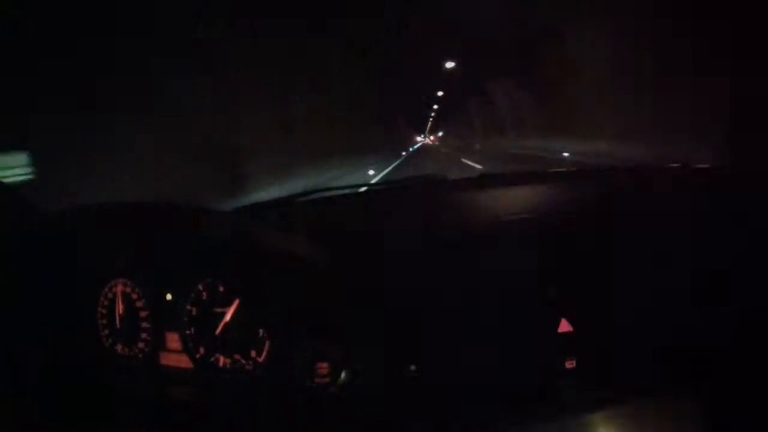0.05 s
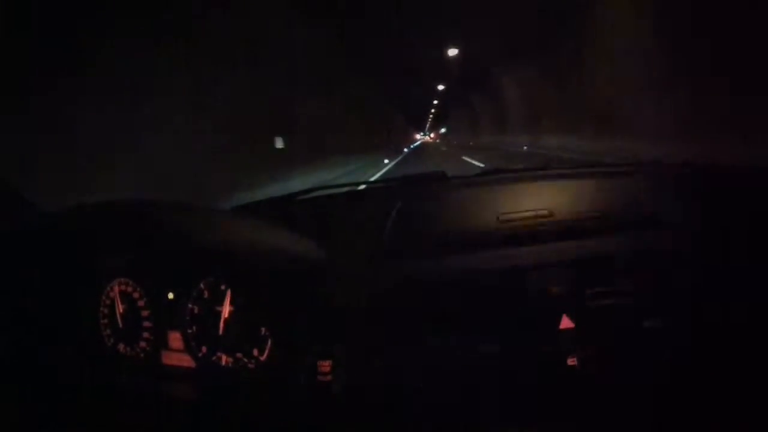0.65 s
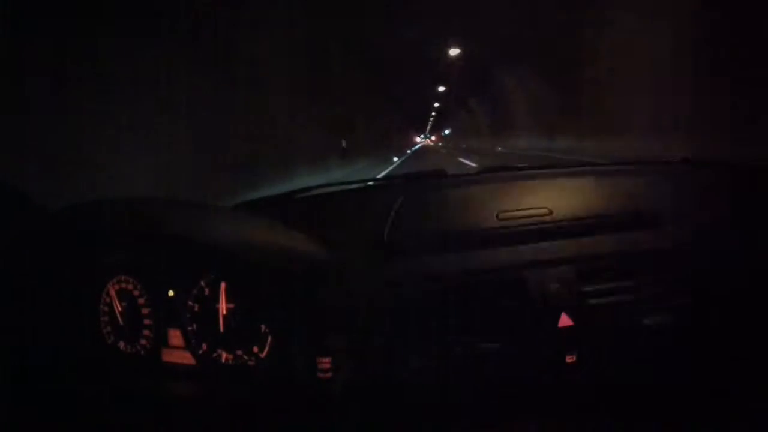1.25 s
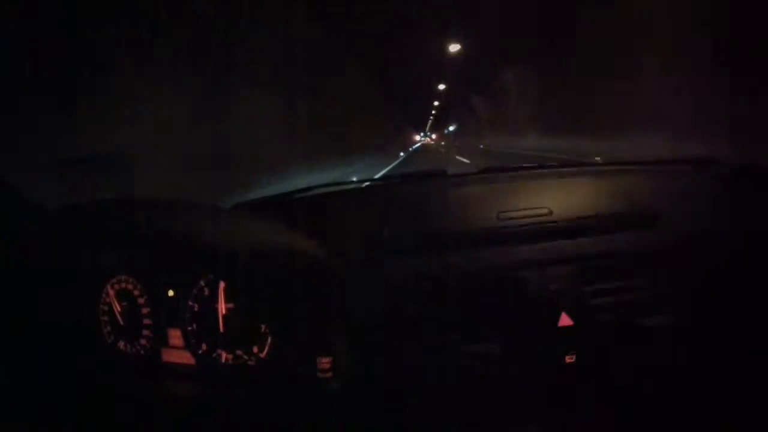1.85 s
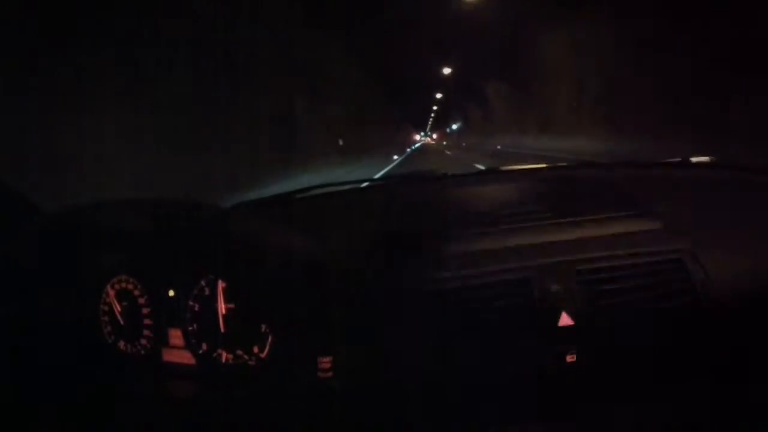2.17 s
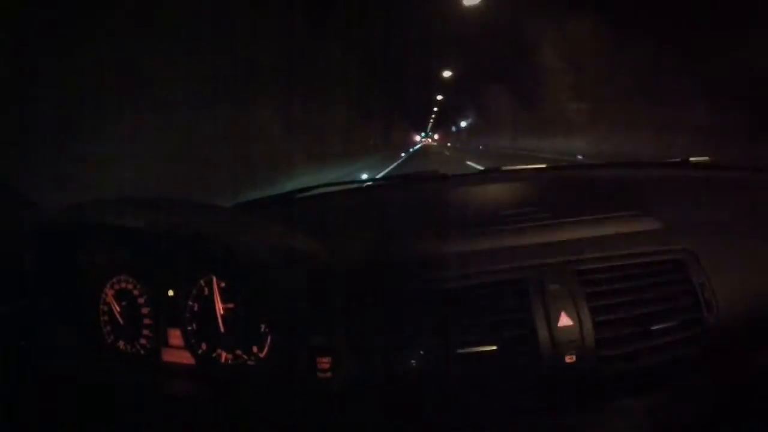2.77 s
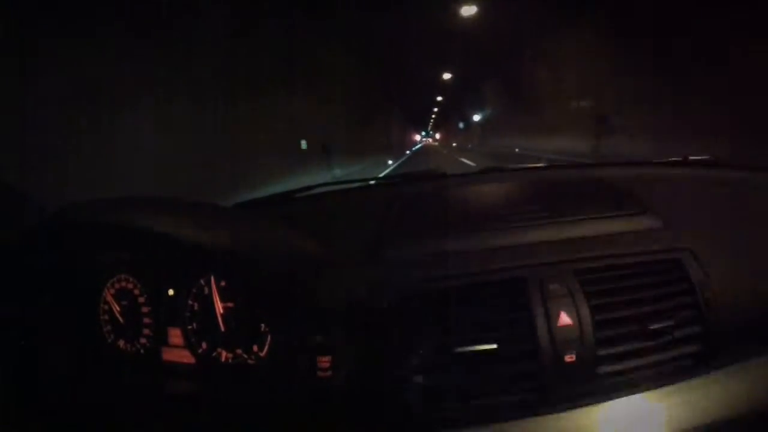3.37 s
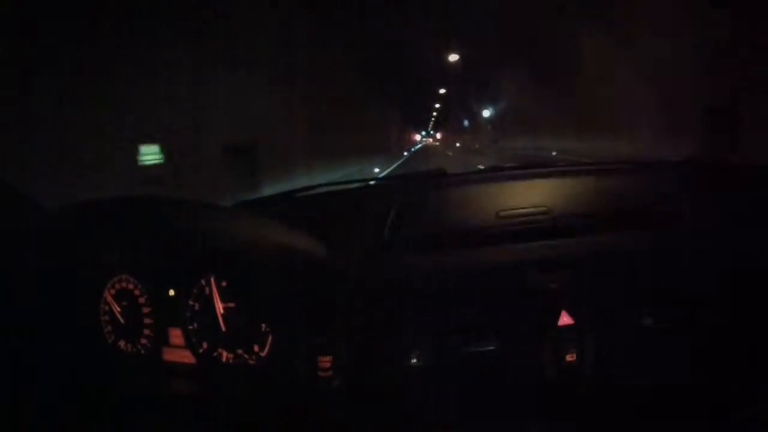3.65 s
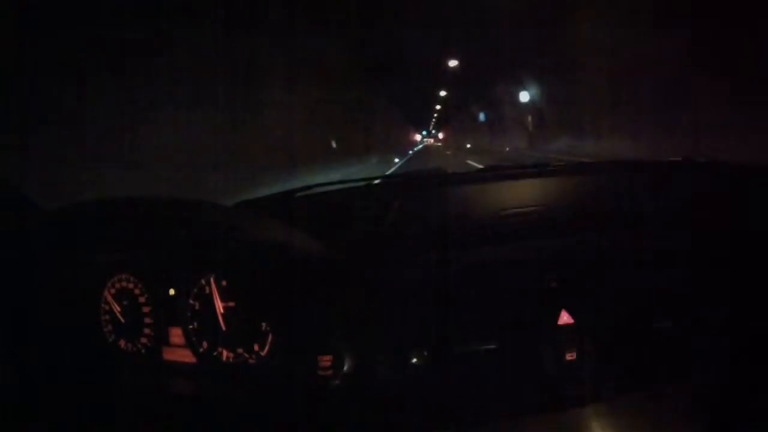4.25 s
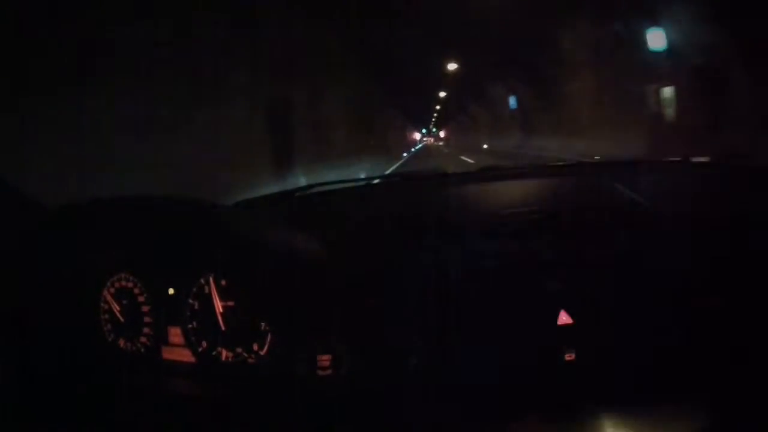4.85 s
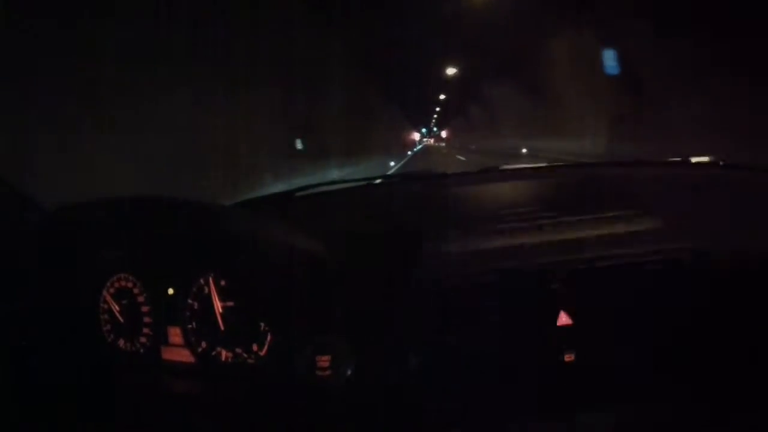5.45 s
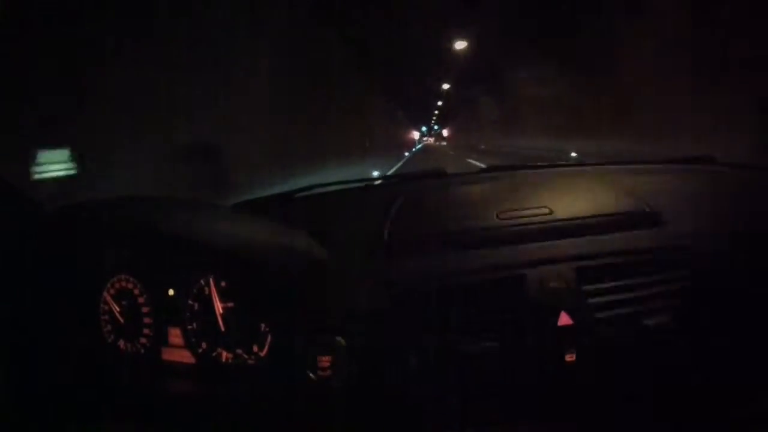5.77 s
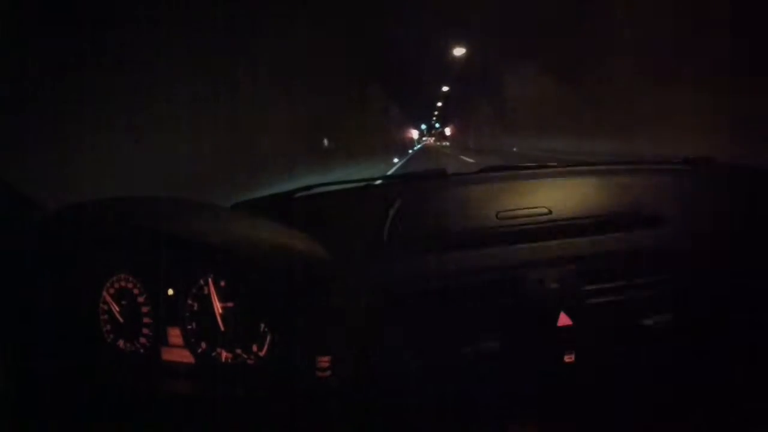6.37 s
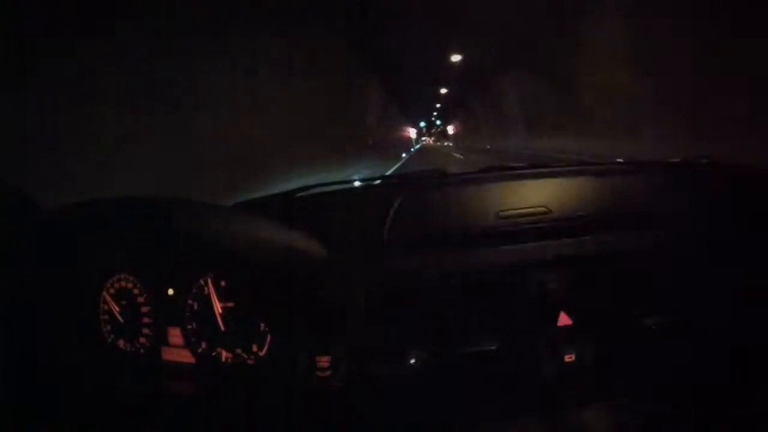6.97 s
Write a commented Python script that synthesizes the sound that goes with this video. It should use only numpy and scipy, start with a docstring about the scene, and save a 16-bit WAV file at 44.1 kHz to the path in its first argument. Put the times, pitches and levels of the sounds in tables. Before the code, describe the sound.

From the driver's seat of a turbocharged car in a tunnel, a deep road rumble and tyre roar continue for about seven seconds, with faint wind hiss. Dull bumps thump the body in quick succession until 2.6 seconds, then return near 3.2, 4 and 6.7 seconds. The low engine drone sinks in pitch over the first three seconds, swelling near 1.4 and 2.2, then holds steady. A slowly pulsing tyre whine builds over the first two seconds and surges again around 6. Loose plastic trim ticks near 2.6 seconds. The walls throw back faint whooshes at about 2, 4 and 6 seconds. Just after 4 seconds a push on the throttle makes the engine fuller, and the exhaust booms from 4.5 to 5.5 seconds. The drone then falls back, and rough road deepens the rumble near 6 seconds.

```python
"""Low road rumble, tyre roar and a sinking engine drone, inside a turbocharged car in a tunnel.
Bumps shake and thump the body. Roar and hiss follow the road surface; the tread sings in a slow beat.
The walls throw back faint whooshes; loose trim ticks. The revs settle, one push on the throttle brings
out the engine's overtones, and once the turbo has spun up the exhaust booms for a second."""
import sys
import numpy as np
from scipy import signal
from scipy.fft import rfft, irfft
from scipy.io import wavfile
from scipy.ndimage import uniform_filter1d, minimum_filter1d

SR = 44100
rng = np.random.default_rng(int(sys.argv[2]) if len(sys.argv) > 2 else 0)


def put_to_file(sound):
    """Save the sound as 16-bit audio at rate SR, in the file named by the first command-line argument."""
    columns = np.atleast_2d(sound).T  # one column per channel
    safe = np.clip(columns, -1, 1)
    whole_steps = np.round(safe * 32767)
    wavfile.write(sys.argv[1], SR, whole_steps.astype(np.int16))


N = 317520

# body heaving on springs and bushes: f/Hz, width/Hz, relative level/dB
HEAVE_MODES = [(20, 9, -5), (32.2, 13.2, -0.5)]
# lowest cabin air mode: f/Hz, width/Hz, relative level/dB
AIR_MODE = [(56.6, 6.4, 1)]
# rough road patches: t/s, gain/dB
ROUGH_PATCHES = [(2.1, 4.5), (3.08, 4), (3.6, 3), (6.07, 6.5), (7.12, 3)]
# hollow mid rumble: f/Hz, width/Hz, relative level/dB
RUMBLE_MODES = [(262, 30, 0.5), (291, 40, 3.5)]
# body and cabin air modes: f/Hz, width/Hz, level/dB
BODY_MODES = [(82, 24, -33.5), (135.7, 32, -26), (155, 27, -37), (219, 40, -32.5)]
# road coarseness: t/s, level/dB re average asphalt
COARSENESS = [(0.0, -2), (0.27, -0.5), (0.55, -2), (0.95, -1), (1.22, 0.5), (1.75, 0), (2.03, 1),
              (2.3, 0.5), (3.15, 0), (3.5, 1.5), (3.75, -0.0), (4.0, 1.3), (4.8, 0.55), (5.35, -1.4),
              (6.0, 0.5), (6.25, 0.5), (6.95, 1.8), (7.2, 3)]
# tyre roar through doors and floor: f/Hz, relative density/dB
ROAR_SPECTRUM = [(150, -22), (350, -8), (470, -7), (540, -2.5), (620, -1), (690, -4.5), (775, 1.5),
                 (900, -2.5), (1030, -8.5), (1150, -10.5), (1340, -16), (1580, -14.5), (2100, -23.5),
                 (2700, -32.5), (4000, -51)]
# engine firing rate: t/s, f/Hz
FIRING_RATE = [(0.0, 228.8), (0.8, 208.8), (1.2, 201.4), (1.6, 199.3), (2.0, 191), (2.6, 183.5),
               (3.2, 178.1), (4.4, 173.6), (5.2, 175.4), (6.2, 175.2), (7.2, 177)]
# exhaust load, lagging the throttle as the turbo spins up: t/s, share/1
TURBO_LOAD = [(4.47, 0), (4.54, 0.63), (4.65, 0.65), (4.73, 0.98), (5.0, 0.96), (5.29, 1), (5.39, .68),
              (5.48, .62), (5.515, 0)]
# firing tone swells and dips: t/s, half-width/s, gain/dB
DRONE_SWELLS = [(1.38, .2, 12.5), (2.15, .3, 7), (3.4, .25, 3), (4.86, .06, -4), (5.227, 0.022, -25),
                (5.43, .016, -10)]
# engine overtones: multiple of firing rate/1, loaded level/dB, delay after push/s, attack/s, hold/s
ENGINE_ORDERS = [(1 / 2, -35.5, .3, .34, 0.36), (3 / 2, -33.5, .6, 0.35, 0.2), (2, -31.5, 0, .45, 0.48),
                 (5 / 2, -31, -.08, 0.35, 0.14), (3, -32, 0.2, 0.1, 0.05)]
# air past glass and seals: f/Hz, relative density/dB
WIND_SPECTRUM = [(1500, -14.5), (2300, 0), (2780, 3.5), (3100, -3.5), (3600, -2), (4100, -6), (4750, -13.5),
                 (5250, -9.5), (6100, -21.5), (7500, -25.5), (9000, -34.5), (10500, -38), (13500, -52.5)]
# tread tones: f/Hz, width/Hz, relative level/dB
TREAD_TONES = [(615, 22, -11), (804, 32, -1.5), (850, 26, -6), (925, 34, -7)]
# tread song surges: t/s, half-width/s, gain/dB
TREAD_SURGES = [(1.52, .1, 2.5), (2.15, .13, 4), (5.87, .17, 3), (6.2, .08, 5), (6.55, 0.27, 2.5),
                (7.05, .12, 2)]
# low tread tone: f/Hz, width/Hz, level/dB under full push once built up (quieter otherwise)
TREAD_LOW_TONE = [(404, 12, -30.7)]
# road bumps: t/s, envelope peak/dB
ROAD_BUMPS = [(0.13, -12), (0.365, -8.5), (0.56, -9), (0.87, -10), (0.99, -10), (1.34, -11), (1.465, -10),
              (1.69, -12), (1.885, -10.5), (2.175, -10), (2.235, -9.5), (2.555, -10.5), (3.21, -13),
              (3.95, -13), (4.125, -9), (6.655, -7.5)]
# wall features going by: t/s, half-width/s, level/dB
WALL_FEATURES = [(2.0, .1, -42), (4.0, .14, -44.5), (6.046, 0.051, -40)]
# their whoosh: f/Hz, relative density/dB
WHOOSH_SPECTRUM = [(1100, 2.5), (2700, -7.5), (5200, -20), (6500, -25.5), (8500, -31), (13000, -54)]
# trim ticks: t/s, f/Hz, decay/s, level/dB before the envelope
TRIM_TICKS = [(2.560, 1650, 0.0035, -13), (6.195, 12800, .003, -53)]

PUSH_S, PUSH_ATTACK_S, PUSH_RELEASE_S = 4.12, 0.34, 0.23
THUMP_HZ, THUMP_RISE_S = 33, 0.022
TIME_S = np.arange(N) / SR
BINS_HZ = np.maximum(np.arange(N // 2 + 1) * SR / N, 1)


def undb(db):
    """Decibels to gain."""
    return 10 ** (np.asarray(db) / 20)


def unit(x):
    """Scale to rms 1."""
    return x / np.sqrt(np.mean(x ** 2))


def curve(rows):
    """Join (t/s, value) rows by straight lines."""
    return np.interp(TIME_S, *np.transpose(rows))


def ramp(start_s, length_s):
    """Linear rise from 0 to 1, then hold."""
    return np.clip((TIME_S - start_s) / length_s, 0, 1)


def bell(centre_s, half_width_s):
    """Gaussian swell, peak 1."""
    return np.exp(-((TIME_S - centre_s) / half_width_s) ** 2)


def walk(rate_hz):
    """Random steps, smoothed twice; rms 1."""
    hold = int(SR / rate_hz)
    steps = np.repeat(rng.standard_normal(1000), hold)[:N]
    return unit(uniform_filter1d(uniform_filter1d(steps, hold), hold))


def noise(response):
    """White noise through a frequency response."""
    return irfft(rfft(rng.standard_normal(N)) * response, N)


def hiss(spectrum):
    """Noise shaped by (f/Hz, density/dB) rows, rolled off past both ends; rms 1."""
    hz, db = np.transpose(spectrum)
    skirts = np.minimum(BINS_HZ / hz[0], 1) ** 2 * np.minimum(hz[-1] / BINS_HZ, 1) ** 4
    return unit(noise(skirts * undb(np.interp(np.log(BINS_HZ), np.log(hz), db))))


def ring(modes):
    """Steep-sided resonances under random forcing, each at its own rms level."""
    power = 0
    for hz, width_hz, db in modes:
        detune = (BINS_HZ / hz - hz / BINS_HZ) * hz / width_hz
        power += (undb(db) * unit(1 / (1 + detune ** 2 / 2))) ** 2
    return noise(np.sqrt(power))


def steady(x, share, span_s):
    """Even out a share of a narrow band's random swelling."""
    power = uniform_filter1d(np.abs(signal.hilbert(x)) ** 2, int(span_s * SR))
    return unit(x * power ** (-share / 2)) * np.std(x)


def throttle(delay_s, attack_s, hold_s):
    """Response to the push, 0-1: attack, hold, release."""
    start_s = PUSH_S + delay_s
    return ramp(start_s, attack_s) - ramp(start_s + attack_s + hold_s, PUSH_RELEASE_S)


def patch_db():
    """Extra shaking on rough patches."""
    return sum(db * bell(at_s, 0.23) for at_s, db in ROUGH_PATCHES)


def road(easing_db_per_s=-0.15, duck_db=-5):
    """Small bumps keep body and cabin air ringing; rough patches make the air boom."""
    # the low heave eases as the road smooths out, and dips briefly under each thump
    dips_db = duck_db * sum(bell(at_s + THUMP_RISE_S, 0.035) for at_s, _ in ROAD_BUMPS)
    heave_db = -17 + easing_db_per_s * TIME_S + dips_db
    heave = undb(heave_db) * steady(ring(HEAVE_MODES), share=0.85, span_s=0.24)
    boom = undb(-26 + patch_db()) * steady(ring(AIR_MODE), share=0.89, span_s=0.26)
    rumble_db = -30.5 - 6.5 * ramp(2.02, 3.2)
    rumble = undb(rumble_db) * steady(ring(RUMBLE_MODES), share=0.37, span_s=0.39)
    body = steady(ring(BODY_MODES), share=0.35, span_s=0.49)
    return heave + boom + rumble + body


def tyre_roar(asphalt_db=-21, flutter_db=0.14):
    """Rolling tyres roar louder on a coarser surface."""
    return undb(asphalt_db + curve(COARSENESS) + flutter_db * walk(14)) * hiss(ROAR_SPECTRUM)


def drone(firing_hz, phase, base_db=-32, boost_db=18, linger_db=2.5, slope_db_per_hz=-0.15):
    """The firing tone booms in the cabin, most at low revs and under exhaust load."""
    load = curve(TURBO_LOAD)
    swell_db = sum(db * bell(at_s, half_s) for at_s, half_s, db in DRONE_SWELLS)
    rough_db = 1.8 * walk(30) + 2.5 * (1 - load) * walk(5.89)
    revs_db = slope_db_per_hz * (firing_hz - firing_hz.min())
    push_db = boost_db * load + linger_db * ramp(PUSH_S, PUSH_ATTACK_S) * (1 - load)
    return undb(base_db + revs_db + push_db + swell_db + rough_db) * np.sqrt(2) * np.sin(phase)


def engine(waver=0.0018):
    """Firing tone, cabin hum and overtones, locked to one slightly wavering phase."""
    firing_hz = curve(FIRING_RATE)
    phase = 2 * np.pi * np.cumsum(firing_hz * (1 + waver * walk(18))) / SR
    return drone(firing_hz, phase) + cabin_hum(firing_hz, phase) + overtones(phase)


def wind(asphalt_db=-42, buffet_db=0.38):
    """Air and tyre hiss, thrown back by the tunnel walls, leak in through the seals."""
    surface_db = 0.78 * curve(COARSENESS) + 0.082 * patch_db()
    return undb(asphalt_db + surface_db + buffet_db * walk(14)) * hiss(WIND_SPECTRUM)


def tread_song(base_db=-28.5, core_hz=806, waver=0.009, beat_period_s=0.743, crest_s=2.16):
    """Unevenly spaced tread blocks sing in smeared, slowly beating tones round a clean core."""
    smeared = steady(ring(TREAD_TONES), share=0.51, span_s=0.13)
    core_phase = 2 * np.pi * np.cumsum(core_hz * (1 + waver * walk(18))) / SR
    core = undb(-6.5) * np.sqrt(2) * np.sin(core_phase)
    beat_db = 2.5 * np.cos(2 * np.pi * (TIME_S - crest_s) / beat_period_s)
    build_db = -6.5 * (1 - ramp(0, 2.1))
    surge_db = sum(db * bell(at_s, half_s) for at_s, half_s, db in TREAD_SURGES)
    return undb(base_db + 0.93 * curve(COARSENESS) + beat_db + build_db + surge_db) * (smeared + core)


def tread_hum(cruise_db=-1.5, start_db=-4.5, build_s=5):
    """A narrow 404 Hz tyre hum builds slowly, slightly louder during the throttle push."""
    push = throttle(delay_s=0, attack_s=PUSH_ATTACK_S, hold_s=0.31)
    gain_db = cruise_db * (1 - push) + start_db * (1 - ramp(0, build_s))
    return undb(gain_db) * steady(ring(TREAD_LOW_TONE), share=0.9, span_s=0.15)


def thumps():
    """Each bump kicks the body, which swings a few times and settles."""
    out = np.zeros(N)
    for at_s, db in ROAD_BUMPS:
        age_s = np.maximum(TIME_S - at_s, 0)
        envelope = age_s / THUMP_RISE_S * np.exp(1 - age_s / THUMP_RISE_S)
        out -= undb(db) * envelope * np.sin(2 * np.pi * THUMP_HZ * age_s)
    return out


def cabin_hum(firing_hz, phase, mode_hz=109, half_width_hz=2, resonant_db=-31):
    """A cabin resonance hums as half the firing rate sinks through it."""
    response = 1 / np.hypot(1, (firing_hz / 2 - mode_hz) / half_width_hz)
    return undb(resonant_db) * response * np.sqrt(2) * np.sin(phase / 2)


def wall_whooshes():
    """Evenly spaced wall features each throw back a short, bright whoosh."""
    envelope = sum(undb(db) * bell(at_s, half_s) for at_s, half_s, db in WALL_FEATURES)
    return envelope * hiss(WHOOSH_SPECTRUM)


def exhaust_pipe(pipe_hz=178, width_hz=26, base_db=-28.5, capture_hz=8, load_db=-6):
    """Uneven firings rumble in the pipe as their rate nears its resonance; load evens them out."""
    closeness = 1 / np.hypot(1, (curve(FIRING_RATE) - pipe_hz) / capture_hz)
    rumble = steady(ring([(pipe_hz, width_hz, base_db)]), share=0.4, span_s=0.16)
    return closeness * undb(load_db * curve(TURBO_LOAD)) * rumble


def trim_ticks(rise_s=0.003, relative_width=0.13):
    """Loose plastic ticks: a rounded start and a broad, quickly damped ring."""
    out = np.zeros(N)
    for at_s, hz, decay_s, db in TRIM_TICKS:
        rise = np.sin(np.pi / 2 * ramp(at_s, rise_s)) ** 2
        decay = np.exp(-np.abs(TIME_S - at_s) / decay_s)
        band = unit(noise(np.exp(-((BINS_HZ / hz - 1) / relative_width) ** 2)))
        out += undb(db) * rise * decay * band
    return out


def overtones(phase, off_load_db=-14.5, rough_db=1.3):
    """Firing harmonics rise with the throttle; unequal cylinder groups add half orders."""
    out = np.zeros(N)
    for order, loaded_db, delay_s, attack_s, hold_s in ENGINE_ORDERS:
        load = throttle(delay_s, attack_s, hold_s)
        level_db = loaded_db + off_load_db * (1 - load) + rough_db * walk(6.7)
        out += undb(level_db) * np.sqrt(2) * np.sin(order * phase + rng.uniform(0, 2 * np.pi))
    return out


def scene():
    """All sources at the driver's seat, mono."""
    motor = engine() + exhaust_pipe()
    rolling = tread_hum() + road() + thumps() + tyre_roar() + tread_song()
    return (motor + rolling + wind() + wall_whooshes() + trim_ticks())[None]


def record(dry, low_cut_hz=12, limit_db=-1.8, limit_span_s=0.02, top_hz=14200):
    """Low cut, peak limiter, soft ends, steep top cut."""
    wet = signal.sosfilt(signal.butter(2, low_cut_hz, "high", fs=SR, output="sos"), dry)
    span = int(limit_span_s * SR)
    overshoot = np.maximum(np.abs(wet) / undb(limit_db), 1)
    gain = minimum_filter1d(1 / overshoot, 2 * span)
    wet *= uniform_filter1d(uniform_filter1d(gain, span), span)
    wet *= signal.windows.tukey(N, 0.0005)
    return signal.sosfilt(signal.ellip(8, 0.2, 70, top_hz, fs=SR, output="sos"), wet)


dry = scene()
out = record(dry)
put_to_file(out)
```